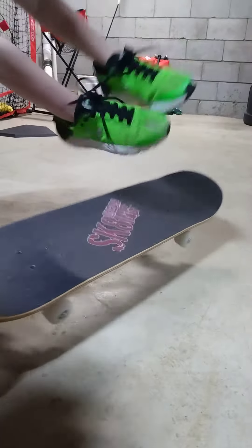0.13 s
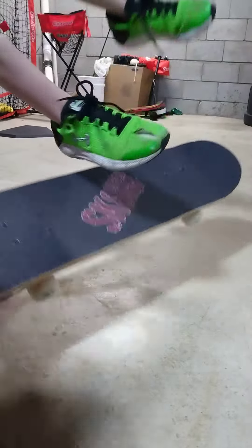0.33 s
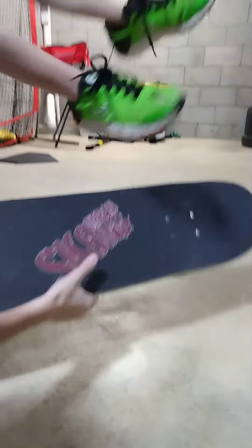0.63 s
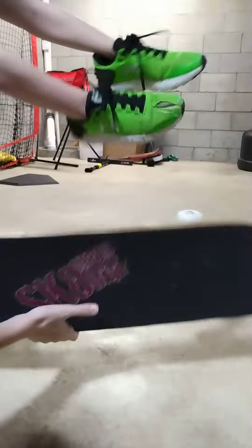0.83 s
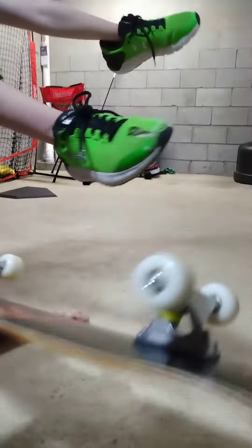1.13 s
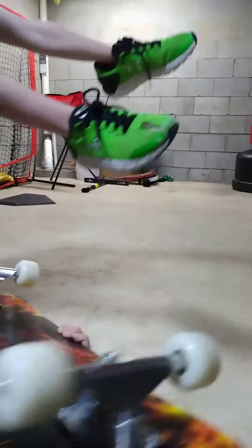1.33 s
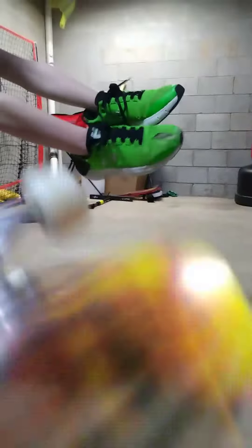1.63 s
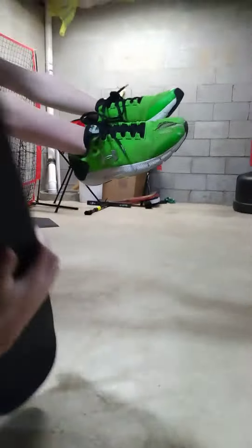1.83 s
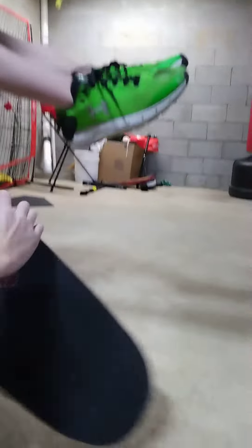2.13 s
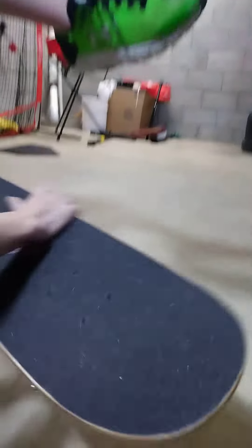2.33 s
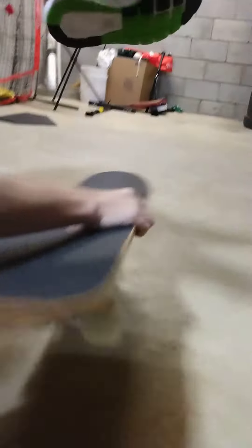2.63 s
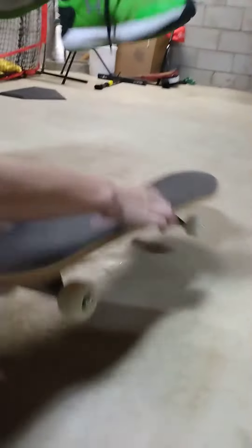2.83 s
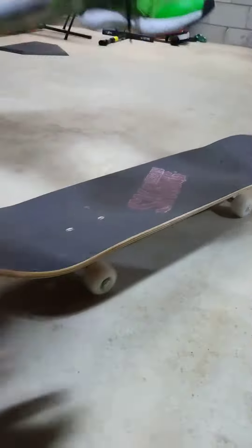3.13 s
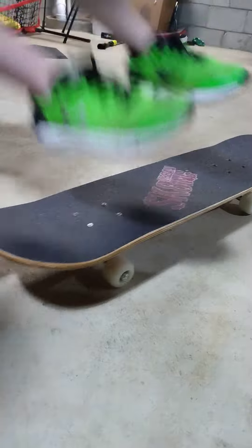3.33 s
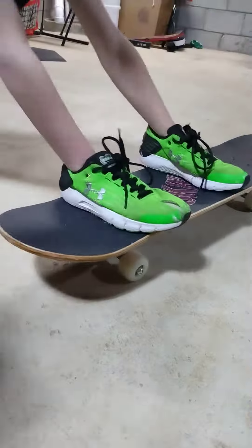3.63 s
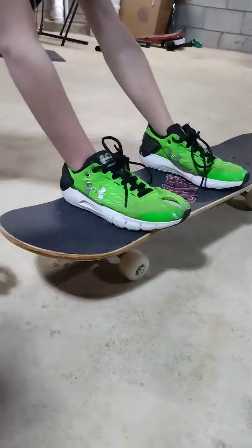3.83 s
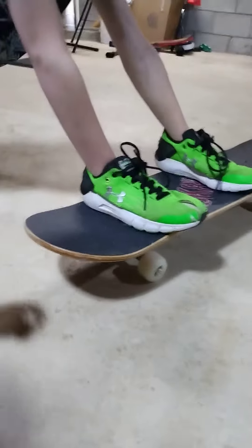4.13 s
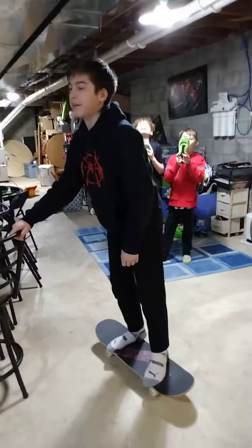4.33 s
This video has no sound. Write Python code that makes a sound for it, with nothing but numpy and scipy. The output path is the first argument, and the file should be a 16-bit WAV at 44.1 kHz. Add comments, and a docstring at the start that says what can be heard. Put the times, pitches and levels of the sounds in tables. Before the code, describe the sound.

A skateboard is turned by hand over a hard floor: faint hiss of grip tape, low rumble, small ticks and three soft shoe slaps. A hard wooden crack follows near two seconds, then more quiet handling, a loud bouncing wheel clatter at three, and a solid landing knock. Close stereo pickup, with room echo on every hit.

```python
"""In a concrete basement, a skateboard is turned over by hand below a skater whose hanging shoes pat together.
Its tail knocks on the floor, it drops and clatters onto its wheels, and both feet land on the deck.
Knocks, ticks and pats are a click plus a short burst of noise; the deck's ring and the thump are fading tones.
Hands rubbing the grip tape, rustle, rumble and a free wheel's whir are noise that swells and fades.
Echo is added to all the hits."""
import sys
import numpy as np
from scipy import signal
from scipy.fft import rfft, irfft, next_fast_len
from scipy.io import wavfile

SR = 44100
rng = np.random.default_rng(int(sys.argv[2]) if len(sys.argv) > 2 else 0)


def store_wav(level_fs):
    """Save 16-bit WAV to argv[1]."""
    pcm = np.round(np.clip(np.atleast_2d(level_fs), -1, 1) * 32767)
    wavfile.write(sys.argv[1], SR, pcm.T.astype(np.int16))


N = 197610
TIME = np.arange(N) / SR


# Board hitting concrete: tail tap, drop with its bounces, landing.
# Columns: t/s, level/dB, thud/dB, body/dB, hardness/dB, left minus right/dB
BOARD_KNOCKS = [ (1.9101, -13, 11.5, -15, -20, -6), (1.9156, 2, 0.5, 0, -17, 3),
                (1.926, -6, 1, -15.5, -8.5, -16), (1.931, -2.5, 3.5, -16, 3, -0.5),
                (1.942, -7.5, 8, -19, -21, -1), (3.0162, -6.5, 13.5, 9.5, 12, .5),
                (3.019, 1.5, 5.5, -4, 6, 8), (3.0284, -3, 5, 7.5, 4.5, 1),
                (3.038, -10.5, 13.5, 13.5, 14.5, -3), (3.049, -6.5, -7, 3, -0.5, 11.5),
                (3.062, -1.5, -3, 4, 29, 1.5), (3.0652, -7.5, 3, 10.5, 20, -2),
                (3.0688, -10.5, 7.5, 4, 13.5, -8), (3.0747, 1, -6, 0, 20.5, -7),
                (3.080, -5, -8, -1, 22.5, 1), (3.1405, -10.5, 3.5, 9, 13.5, -6.5),
                (3.154, -8.5, 3, 11, 14, -4.5), (3.167, -3, -8, -8, 9.5, -3.5),
                (3.189, -6, 9.5, 8.5, 4.5, -3), (3.234, -12.5, -3.5, 3, -9, -4),
                (3.265, -9.5, -8, -3.5, -3, -2.5), (3.5638, -13, 14, 8.5, -1.5, 2.5),
                (3.5682, -2, -3.5, 1, -1, -2.5), (3.5701, -3.5, 3, 3.5, 1.5, 1),
                (3.584, -0.5, 1.5, 0, 3.5, -4), ]
# Basic tone colour of a knock: f/Hz, level/dB
KNOCK_TONE = [(40, -39), (90, -16), (170, -10), (340, -6.5), (650, -1), (1300, -3.5), (1900, -2),
              (2600, -2), (3600, -11.5), (6000, -28), (11000, -36), (16000, -45.5)]
KNOCK_T60_S = 0.04       # time to fade by 60 dB at hardness 0
HALF_LENGTH_DB = 55.5    # this much more hardness halves that time


def board():
    """Tail, wheels and trucks hit the floor; the heavier the blow, the more its click stands out."""
    out = np.zeros((2, N))
    for s, db, thud_db, body_db, hard_db, pan_db in BOARD_KNOCKS:
        knock_db = support_at(s)[0]
        weight = [(60, -3.5), (190, thud_db), (600, body_db), (1400, knock_db), (2500, 0.5)]
        t60 = KNOCK_T60_S * 2 ** (-hard_db / HALF_LENGTH_DB)   # a harder blow is over sooner
        blow = contact(t60, snap_db=12.0 + 0.71 * db)
        knock = coloured(blow, KNOCK_TONE, weight, knock_hardness(s, hard_db))
        add(out, s, knock * from_db([[db + pan_db / 2], [db - pan_db / 2]]))
    return out


CLACK_SHARE = 0.63   # part of the 10 kHz hardness that also reaches the clack at 4 kHz


def knock_hardness(s, hard_db):
    """Treble lift of a blow on concrete: the clack grows more slowly than the crack."""
    clack_db = support_at(s)[1]
    return hardness(clack_db + CLACK_SHARE * hard_db, hard_db)


# How the board is supported: held (bare tail), in free fall, then stood on (loaded wheels).
# Columns: from t/s, knock level near 1.4 kHz/dB, clack level near 4 kHz/dB,
# deck ring level/dB, extra damping/(dB per s)
BOARD_SUPPORT = [(0, -0.5, 4, -38, 80.5), (2.95, -2.5, -1, -37.5, 10.5), (3.5, 4.5, -5, -34, 168)]


def support_at(s):
    """Knock, clack, ring and damping of the board as it is supported at that moment."""
    return [row[1:] for row in BOARD_SUPPORT if row[0] <= s][-1]


# Tones of the ringing deck and trucks: f/Hz, level/dB, t60/s (before the extra damping)
DECK_MODES = [(160.8, -16, 0.067), (195.2, -7.5, 0.12), (337.2, -10.5, 0.9), (381, -11.5, 0.18),
              (552, 5, 0.22), (582, 0, 0.24), (724, -1.5, 0.88), (786.7, -14.5, 0.26), (1077, -7, 0.059),
              (1176, -15.5, 0.65), (1319, -1.5, 0.41), (1805, -7.5, 0.22), (1870, 2, 0.34),
              (2006, 1.5, .18), (2420, 9, 0.074), (2440, -9.5, 0.16), (2440, -12, 0.14), (3010, -10, 0.091),
              (3530, -16, 0.39), (3650, -12, 0.18), (3850, -12, 0.31), (4070, -5, 0.19), (6300, -21, 0.14),
              (7970, -17, 0.072)]
RING_FOLLOWS_BODY, RING_FOLLOWS_HARDNESS = .6, .6   # dB of ring per dB of the blow


def deck_ring(detune):
    """Each blow makes the board's tones ring, each slightly off pitch; hands and feet damp them."""
    t = TIME[:SR // 2]
    hz, mode_db, t60 = np.transpose(DECK_MODES)[:, :, None]
    decay = from_db(mode_db - 60 * t / t60)
    decay[1::2] *= -1   # neighbouring modes swing in opposite senses
    out = np.zeros((2, N))
    for s, db, _, body_db, hard_db, _ in BOARD_KNOCKS:
        _, _, ring_db, damping = support_at(s)
        blow_hz = hz * (1 + detune * rng.standard_normal(hz.shape))
        modes = decay * np.sin(2 * np.pi * blow_hz * t)
        # a harder blow brings out the high tones
        lift = knock_hardness(s, RING_FOLLOWS_HARDNESS * hard_db)
        share_db = at_hz(lift, hz.T)[0]
        level_db = ring_db + db + RING_FOLLOWS_BODY * body_db - damping * t
        add(out, s, from_db(share_db) @ modes * from_db(level_db))
    return coloured(out, [(40, -19.5), (140, 4)])   # a narrow plank radiates little bass


def landing_thump(s, hz, db, t60):
    """The rider's weight sets the whole plank swinging on its trucks: one low tone that dies quickly."""
    t = TIME[:SR // 2]
    out = np.zeros((2, N))
    add(out, s, from_db(db - 60 * t / t60) * np.sin(2 * np.pi * hz * t) * np.ones((2, 1)))
    return out


# Ticks of loose trucks and washers: t/s, level/dB, hardness/dB
TRUCK_TICKS = [(0.056, -43.5, 5), (0.984, -32.5, -7), (1.003, -36, 1), (1.088, -37, 0), (1.165, -24.5, 2),
               (1.178, -34.5, 13), (1.723, -30, 0), (1.763, -32, 5), (2.547, -36.5, -0.5),
               (2.604, -27, -14), (2.923, -31.5, -0.5), (2.978, -25, -5.5), (2.997, -32, -6.5),
               (3.68, -27.5, 13.5), (3.796, -31.5, 3.5), (4.082, -60.5, 26.5)]
# Basic tone colour of a tick: f/Hz, level/dB
TICK_TONE = [(100, -2), (600, -12), (1500, -4.5), (2100, -1.5), (2550, 2.5), (3300, -15.5), (6000, -32.5),
             (15000, -43.5)]
TICK_T60_S = 0.041


def trucks():
    """Loose hardware ticks as the board tilts: small, bright contacts."""
    out = np.zeros((2, N))
    for s, db, hard_db in TRUCK_TICKS:
        blow = contact(TICK_T60_S, snap_db=9.0)
        tick = coloured(blow, TICK_TONE, hardness(hard_db, hard_db))
        add(out, s, from_db(db) * tick)
    return out


# Shoes patting together: t/s, level/dB, thud/dB
SHOE_PATS = [(0.1748, -28.5, 4), (0.8621, -22.5, -6), (1.592, -21.5, 0.5)]
# Basic tone colour of a pat: f/Hz, level/dB
PAT_TONE = [(50, -5), (160, 7.5), (330, -1), (600, -1), (1050, 1.5), (1500, -9), (2500, -7.5), (3600, -22),
            (7000, -26), (11000, -23), (16000, -37)]
PAT_T60_S = 0.053


def shoes():
    """Rubber soles meet with a soft slap, whose noise builds up more slowly than a knock's."""
    out = np.zeros((2, N))
    for s, db, thud_db in SHOE_PATS:
        weight = [(60, 0), (190, thud_db), (500, 0)]
        slap = contact(PAT_T60_S, snap_db=13, rise_s=.0012)
        add(out, s, from_db(db) * coloured(slap, PAT_TONE, weight))
    return out


# A hand slides over the grip tape: start t/s, attack/s, release/s, hiss level/dB
HAND_RUBS = [(.17, 0.12, 0.43, -65.5), (0.422, 0.067, .05, -62.5), (.64, 0.035, .26, -58),
             (.89, 0.077, 0.9, -64), (1.041, .15, .95, -66), (2.46, 0.045, 0.039, -56),
             (2.659, 0.112, 0.25, -58.5), (3.32, 0.027, 0.18, -57.5), (4.24, 0.11, 0.085, -67.5)]
# Tone colour of the hiss: f/Hz, level/dB
RUB_TONE = [(1200, -0.5), (2500, 0.5), (4200, -0.5), (7000, -1), (11000, 1.5), (13000, -3.5), (16000, -0.5)]


def grip_tape_rub():
    """Skin hisses as it drags over rough grip tape; a faint hiss stays in between."""
    slide = together([swell(*rub) for rub in HAND_RUBS], still_db=-77.5)
    return slide * friction(RUB_TONE, flutter_db=1.7, flutter_hz=200)


# A hand shifts its grip: start t/s, release/s, level/dB
GRIP_SHIFTS = [(.44, 0.066, -57.5), (.66, .2, -51.5), (.93, 0.13, -51), (1.099, .9, -55),
               (1.68, 0.23, -52.5), (2.449, 0.093, -45.5), (2.68, 1, -56.5), (2.92, .15, -51)]
# Tone colour of the rustle: f/Hz, level/dB
RUSTLE_TONE = [(150, -9.5), (500, 7.5), (1000, -3), (1600, -0.5), (2500, 7), (3300, -7.5), (5000, -15),
               (15000, -29.5)]
GRIP_ATTACK_S = 0.06


def deck_rustle():
    """The deck rustles under a shifting hand, over a faint steady rustle."""
    shifts = [swell(s, GRIP_ATTACK_S, release, db) for s, release, db in GRIP_SHIFTS]
    grip = together(shifts, still_db=-66.5)
    return grip * friction(RUSTLE_TONE, flutter_db=1.5, flutter_hz=69.7)


# The board is swung or weighted: start t/s, release/s, level/dB
BOARD_SWAYS = [(-.04, 1, -53.5), (.9, 0.13, -47), (1.14, 0.53, -46), (2.02, 0.47, -43.5), (2.52, 0.56, -47),
               (3.359, 0.94, -45.5), (3.62, 0.58, -43), (3.891, 0.17, -45.5)]
# Tone colour of the rumble: f/Hz, level/dB
RUMBLE_TONE = [(20, -27), (45, -11.5), (70, -2), (110, -2.5), (170, 2), (260, -8.5), (400, -15), (600, -13),
               (1200, -20), (2600, -31), (4000, -41.5), (16000, -50)]
SWAY_ATTACK_S = 0.06


def sway_rumble():
    """The swung or weighted deck rumbles low, over a faint steady rumble."""
    swings = [swell(s, SWAY_ATTACK_S, release, db) for s, release, db in BOARD_SWAYS]
    sway = together(swings, still_db=-54.5)
    return sway * friction(RUMBLE_TONE, flutter_db=1.0, flutter_hz=24.33)


# A jolt sets a free wheel spinning until it is stopped: start t/s, stop t/s, level/dB
WHEEL_SPINS = [(1.203, 1.805, -61.5), (1.932, 3.023, -62)]
# Tone colour of the whir: f/Hz, level/dB
SPIN_TONE = [(800, -17), (2100, 9.5), (3000, -3), (3500, 2.5), (3850, 10.5), (4250, -16), (4900, -25.5),
             (5800, -10.5), (6700, -10.5), (8000, -40), (16000, -29.5)]
SPIN_UP_S, RUN_DOWN_DB_PER_S, SPIN_STOP_S = 0.04, 1, 0.03


def wheel():
    """A free wheel whirs on its bearings and slowly gets quieter until it stops."""
    gain = 0
    for start, stop, db in WHEEL_SPINS:
        spin_up = np.clip((TIME - start) / SPIN_UP_S, 0, 1)
        not_stopped = np.clip((stop - TIME) / SPIN_STOP_S, 0, 1)
        run_down = from_db(db - RUN_DOWN_DB_PER_S * (TIME - start))
        gain = gain + spin_up * not_stopped * run_down
    return gain * friction(SPIN_TONE, flutter_db=2.0, flutter_hz=28)


# Basement echo: f/Hz, t60/s, level/dB
ROOM_ECHO = [(100.6, 0.23, -7.5), (300, 0.84, -7.5), (670, 0.52, -3), (1324, 0.61, -4.5), (2500, 0.51, -8),
             (4500, 0.37, -9), (7900, 0.2, -8), (15000, 0.22, -13.5)]


def basement_echo(first_s, build_s, early_db, early_s):
    """Echoes from floor and walls build up after a short gap, then die at each band's own rate."""
    t = TIME[:SR]
    spectrum = rfft(even_noise(SR, grain_hz=10))
    hz = np.fft.rfftfreq(SR, 1 / SR)
    edges = np.geomspace(40, 18000, num=19)
    build = np.clip((t - first_s) / build_s, 0, 1)
    onset = build * from_db(early_db * np.exp(-t / early_s))   # the earliest part is held back
    echo = 0
    for low, high in zip(edges, edges[1:]):
        t60, db = at_hz(ROOM_ECHO, np.sqrt(low * high))
        band = irfft(spectrum * (hz >= low) * (hz < high), SR)
        band = band * from_db(-60 * t / t60) * onset
        band /= np.linalg.norm(band, axis=1, keepdims=True)
        echo = echo + band * from_db(db) * np.sqrt(2 * (high - low) / SR)
    return echo


def in_room(x, echo, wet_db):
    """A source plus its echo, which fills both ears wherever the source lies."""
    source = x.mean(axis=0, keepdims=True)
    return x + from_db(wet_db) * signal.fftconvolve(source, echo, axes=1)[:, :N]


def contact(t60, snap_db, grit_db=3.5, rise_s=0.00086):
    """One sharp pulse, plus the dense, uneven, quickly dying shudder of the struck thing."""
    t = TIME[:SR // 5]
    chatter = np.interp(t * 700, np.arange(len(t)), rng.standard_normal(len(t)))
    envelope = from_db(-60 * t / t60) * (1 - np.exp(-t / rise_s))
    burst = even_noise(len(t), grain_hz=101.53) * from_db(grit_db * chatter) * envelope
    burst *= np.linalg.norm(envelope) / np.linalg.norm(burst.mean(axis=0))
    burst[:, 0] += from_db(snap_db)   # the pulse
    return burst


def hardness(clack_db, crack_db):
    """A harder contact is shorter and so lifts the treble: wheels clack, bare metal cracks."""
    return [(2400, 0), (4000, clack_db), (10000, crack_db)]


def friction(colour, flutter_db, flutter_hz):
    """Coloured noise whose strength wavers as the contact catches and slips; average (rms) level 1."""
    knots = rng.standard_normal(N)
    waver = np.interp(TIME * flutter_hz, np.arange(N), knots)
    x = coloured(stereo_noise(N), colour) * from_db(flutter_db * waver)
    return x / np.std(x)


def swell(start, attack, release, db):
    """Gain of one movement: it rises smoothly, then falls by 20 dB in each release time."""
    t = TIME - start
    rise = np.sin(np.pi / 2 * np.clip(t / attack, 0, 1)) ** 2
    return rise * from_db(db - 20 * np.maximum(t - attack, 0) / release)


def together(gains, still_db):
    """Movements add in power, on top of a steady background."""
    return np.sqrt(from_db(still_db) ** 2 + sum(g ** 2 for g in gains))


def even_noise(size, grain_hz):
    """Stereo noise without chance peaks in its spectrum, as in a field of very many reflections."""
    window = int(SR / grain_hz)
    frames = signal.stft(stereo_noise(size), nperseg=window)[2]
    flat = frames / (np.abs(frames) + 1e-12)
    x = signal.istft(flat, nperseg=window)[1][:, :size]
    return x / np.std(x)


# Stereo width of noise: f/Hz, side minus mid level/dB
STEREO_WIDTH = [(100, -22.5), (190, -13.5), (350, -6), (700, -1.5), (1300, -0.5), (2500, -0.5), (4000, 0),
                (12000, 2)]


def stereo_noise(size):
    """White noise that is alike in both ears in the bass and largely unrelated in the treble."""
    mid, side = rng.standard_normal((2, size))
    side = coloured(side, STEREO_WIDTH)
    # undo the extra power that the side signal brings
    even = [(hz, -10 * np.log10(1 + from_db(db) ** 2)) for hz, db in STEREO_WIDTH]
    return coloured(np.array([mid + side, mid - side]), even)


def coloured(x, *spectra):
    """Filter with the summed dB of the spectra, with no sound ahead of its cause (minimum phase)."""
    length = x.shape[-1]
    size = 2 * next_fast_len(length // 2 + 2048)
    hz = np.abs(np.fft.fftfreq(size, 1 / SR))
    log_gain = np.log(from_db(sum(at_hz(points, hz)[0] for points in spectra)))
    response = np.exp(np.conj(signal.hilbert(log_gain)))[:size // 2 + 1]
    return irfft(rfft(x, size) * response, size)[..., :length]


def at_hz(points, hz):
    """Each column of a spectrum, read on a log-frequency axis."""
    known, *columns = np.transpose(points)
    return [np.interp(np.log(hz + 1e-9), np.log(known), c) for c in columns]


def from_db(db):
    """Decibels to gain."""
    return 10 ** (np.asarray(db) / 20)


def add(out, s, sound):
    """Mix a sound in at a time."""
    start = int(np.clip(round(s * SR), 0, N - 1))
    out[:, start:start + sound.shape[-1]] += sound[:, :N - start]


# How the hits lean to one side: f/Hz, left minus right level/dB
SIDE_LEAN = [(150, 1.5), (350, -3), (600, -3), (1300, 0.5), (2400, 7), (3700, -2), (6000, -3.5),
             (11000, 2.5)]


def scene():
    """All the hits with their echo, plus the sounds of handling, close by and without echo."""
    echo = basement_echo(first_s=0.0025, build_s=.014, early_db=-9, early_s=0.012)
    hits = in_room(board() + trucks(), echo, wet_db=2)
    hits += in_room(deck_ring(detune=.008), echo, wet_db=-4)
    hits += in_room(landing_thump(s=3.565, hz=153.2, db=-21.5, t60=0.13), echo, wet_db=-9)
    hits += in_room(shoes(), echo, wet_db=10.5)
    # each ear favours different bands
    left_db = [(hz, db / 2) for hz, db in SIDE_LEAN]
    right_db = [(hz, -db / 2) for hz, db in SIDE_LEAN]
    ears = np.array([coloured(hits[0], left_db), coloured(hits[1], right_db)])
    handling = grip_tape_rub() + deck_rustle() + sway_rumble() + wheel()
    return ears + handling * from_db([[.7], [-.7]])   # slightly louder on the left


LOW_CUT_HZ, CUTOFF_HZ = 38, 16700
CEILING = .88   # loud peaks bend smoothly towards this level; full scale is 1


def record(dry):
    """The deepest bass is lost, the loudest peaks are rounded off near full scale and the top is cut."""
    low_cut = signal.butter(2, LOW_CUT_HZ, "high", fs=SR, output="sos")
    top_cut = signal.cheby2(14, 70, CUTOFF_HZ, fs=SR, output="sos")
    lean = signal.sosfilt(low_cut, dry)
    rounded = CEILING * np.tanh(lean / CEILING)
    return signal.sosfilt(top_cut, rounded)


dry = scene()
out = record(dry)
store_wav(out)
```